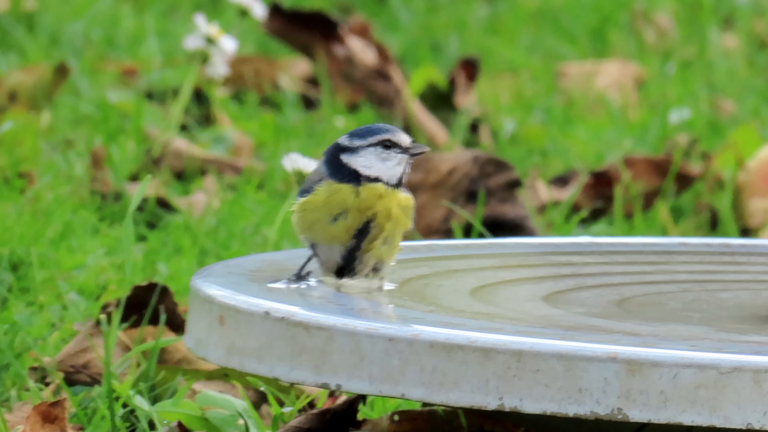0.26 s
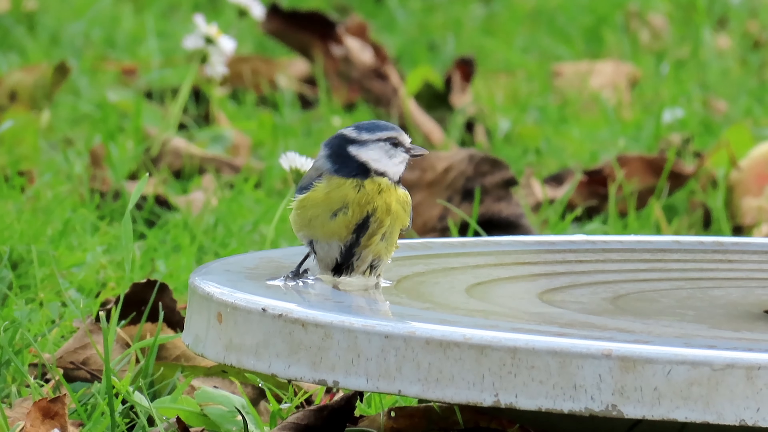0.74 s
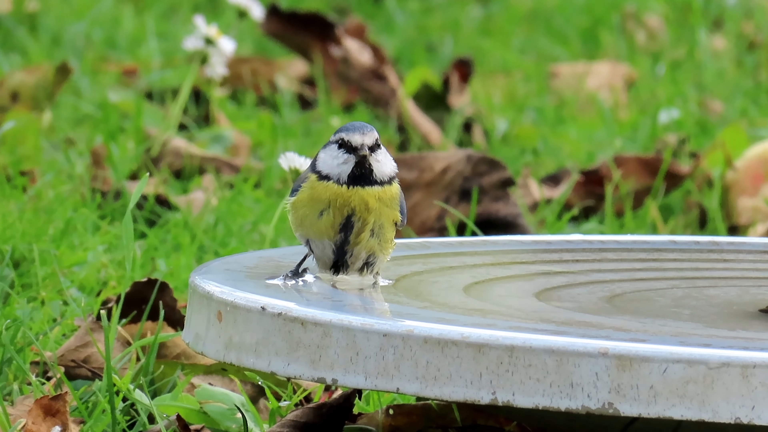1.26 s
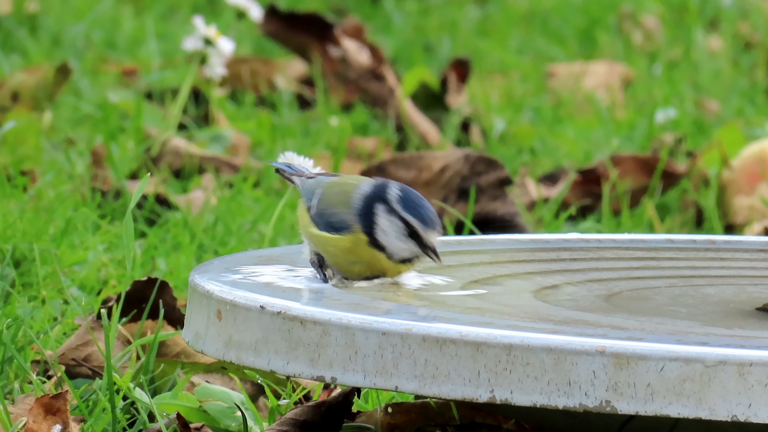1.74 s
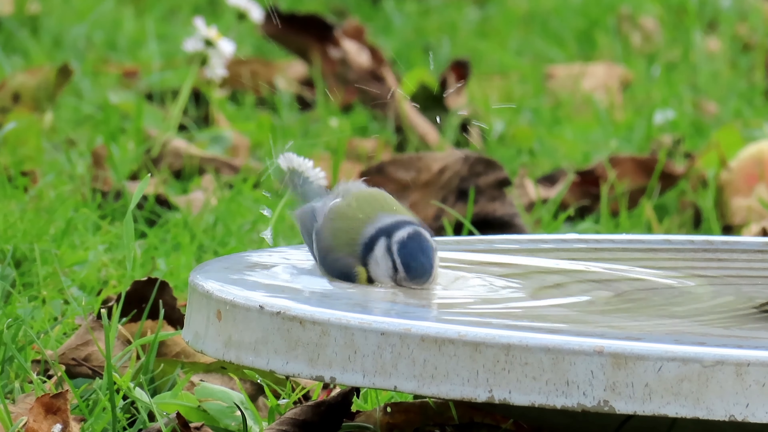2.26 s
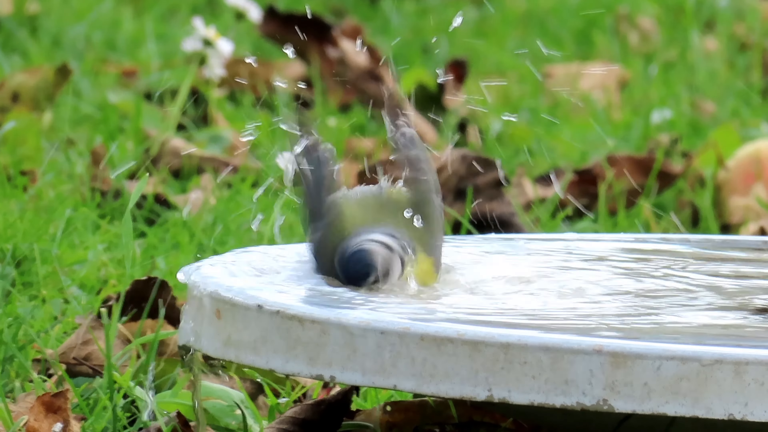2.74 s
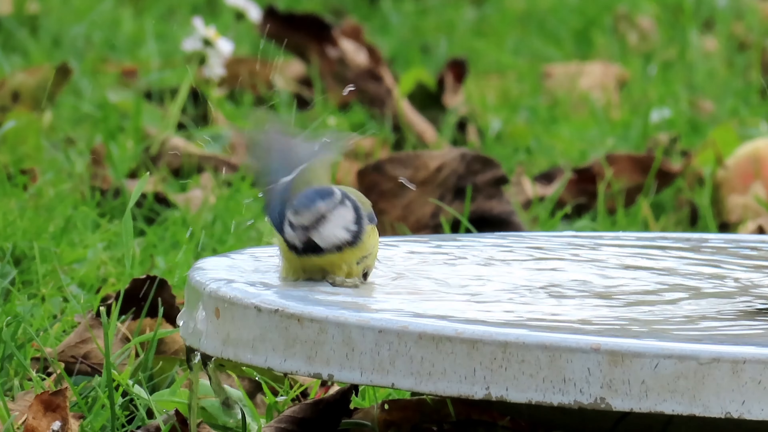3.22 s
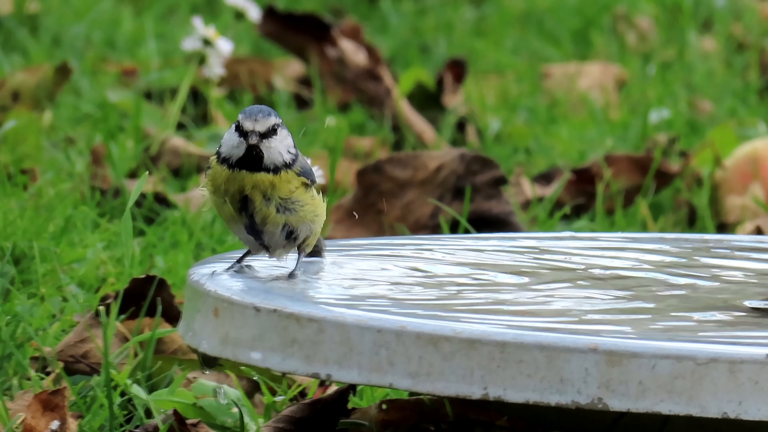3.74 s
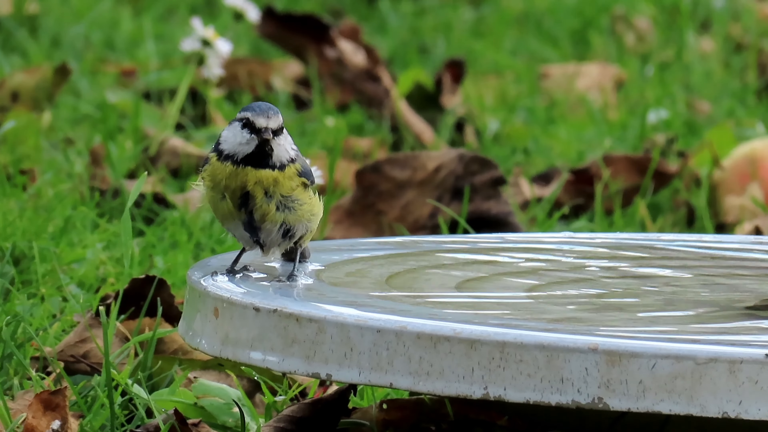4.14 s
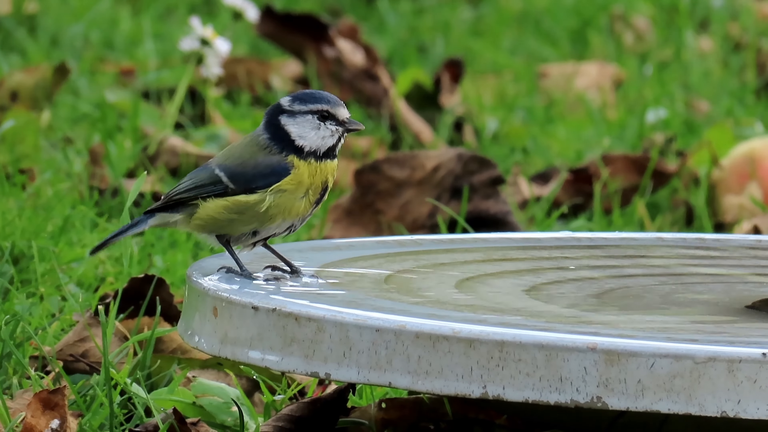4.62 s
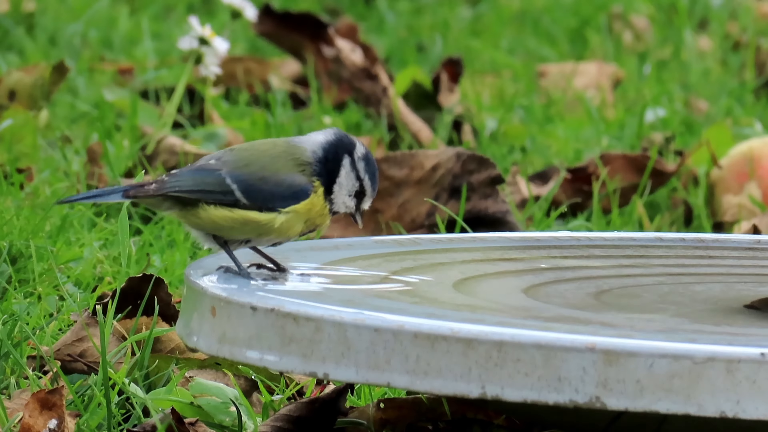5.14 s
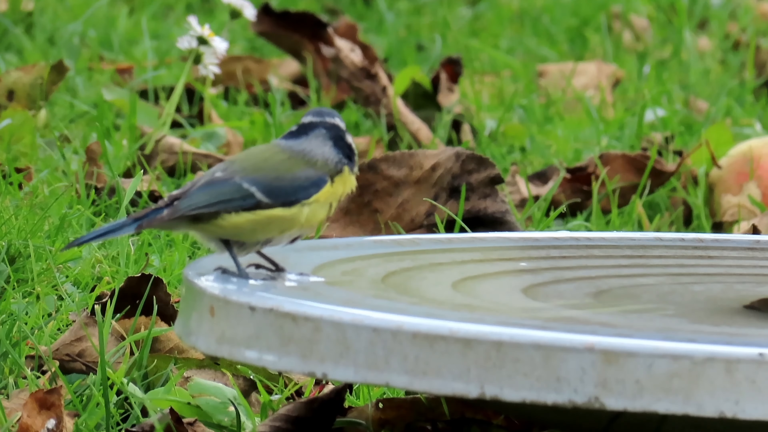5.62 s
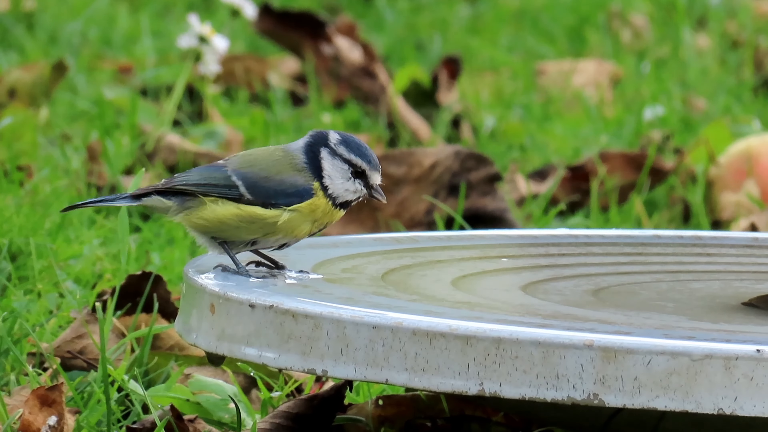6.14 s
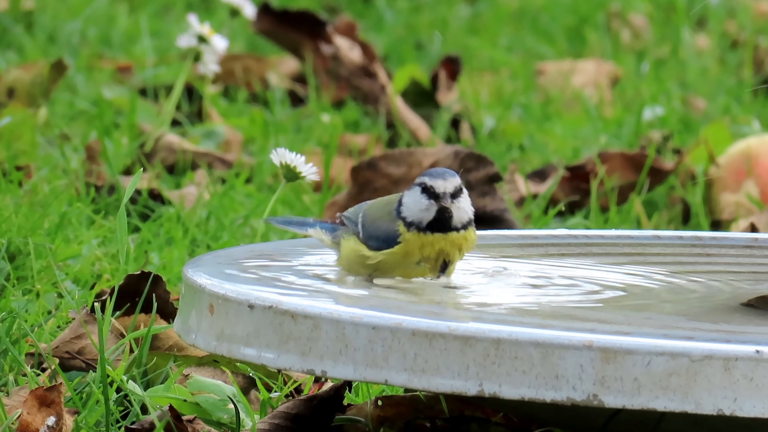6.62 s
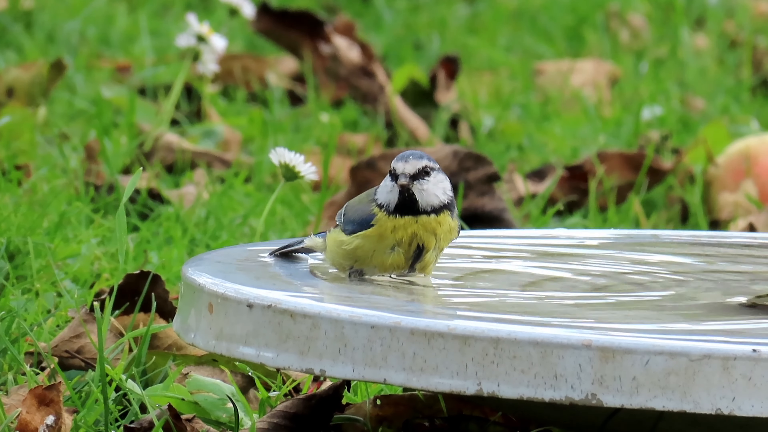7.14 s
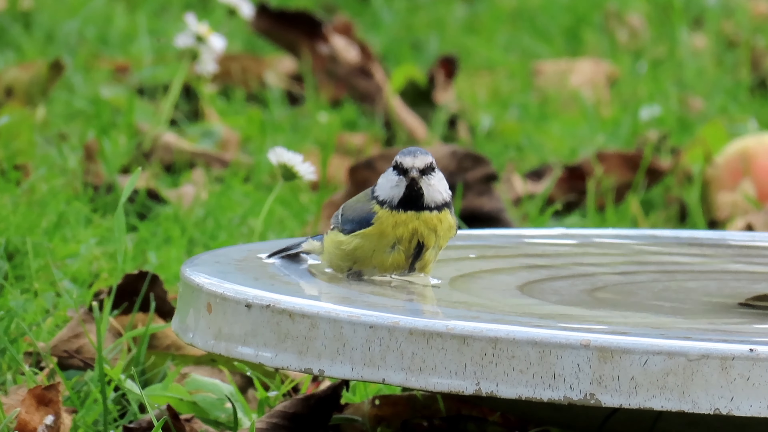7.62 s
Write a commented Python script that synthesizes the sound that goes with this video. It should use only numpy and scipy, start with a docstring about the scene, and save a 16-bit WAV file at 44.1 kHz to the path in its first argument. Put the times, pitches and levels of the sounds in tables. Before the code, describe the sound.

Outdoor stereo bird song with a hot, slightly overdriven microphone. Five loud downward whistles open; the middle phrase is quiet, as if turned down; the last is strong, two rapid fluttering trills leading to repeated falling notes. Thin high calls from neighbouring birds sit to the left, over a constant low road roar and wavering drone. No water splashing is heard.

```python
"""A tit sings in a garden: two high warbled notes, then a run of falling slurs; loud, faint, and loud again.
Its notes are gliding sines; the slurs overdrive their microphone channel, the warbles are limited.
Other small birds call from the left as gliding sines, with echoes; soft ticks are puffs of band noise.
Distant traffic rumbles steadily beneath: coloured noise and a wavering low drone."""
import sys
import numpy as np
from scipy import signal
from scipy.fft import rfft, irfft, next_fast_len
from scipy.io import wavfile
from scipy.ndimage import uniform_filter1d, map_coordinates

SR = 44100
rng = np.random.default_rng(int(sys.argv[2]) if len(sys.argv) > 2 else 0)


def generate_wav(signal):
    """Clip the signal to [-1, 1] and save it as 16-bit WAV at the path in sys.argv[1]."""
    frames = np.transpose(np.atleast_2d(signal))
    scaled = np.clip(frames, -1, 1) * 32767
    pcm = np.round(scaled).astype(np.int16)
    wavfile.write(sys.argv[1], SR, pcm)


N = 347067
T = np.arange(N) / SR


def amp(db):
    """Decibel law: the amplitude gain of a level in dB."""
    return 10 ** (np.asarray(db) / 20)


def unit(x):
    """Normalisation: x scaled to rms 1."""
    return x / np.sqrt(np.mean(x ** 2) + 1e-20)


def along(points, hz):
    """Logarithmic frequency scale: (Hz, value) points interpolated on a log axis."""
    f, v = np.transpose(points)
    return np.interp(np.log(hz + 1), np.log(f + 1), v)


def wobble(rate):
    """Band-limited randomness: a smooth curve through random knots, rate of them a second."""
    return map_coordinates(rng.standard_normal(int(N * rate / SR) + 4), [T * rate])


def filtered(x, response):
    """Linear filtering: the spectrum of x times a response of frequency."""
    m = next_fast_len(N + 8192)
    return irfft(rfft(x, m) * response(np.fft.rfftfreq(m, 1 / SR)), m)[..., :N]


def span(start, length):
    """Sampling: the sample times of a note, in seconds."""
    return (round(start * SR) + np.arange(round(length * SR))) / SR


def add(out, t, hz, db, second_db=-120, third_db=-120, waver=0.036):
    """Frequency modulation: adds a sine with weak overtones, its phase the integral of its pitch."""
    hz, db = uniform_filter1d([hz, db], size=89, mode="nearest")  # rounds the corners
    # the voice is never quite steady
    hz = hz * (1 + waver * uniform_filter1d(rng.standard_normal(len(t)), size=131))
    phase = 2 * np.pi * (np.cumsum(hz) / SR + rng.random())
    tone = np.sin(phase) + amp(second_db) * np.sin(2 * phase) + amp(third_db) * np.sin(3 * phase)
    edge = np.clip(np.minimum(t - t[0], t[-1] - t) / 0.0011, 0, 1)
    note = np.sqrt(2) * amp(db) * edge * tone  # db is the rms level of the fundamental
    inside = (t >= 0) & (t < T[-1])
    out[np.round(t[inside] * SR).astype(int)] += note[inside]


def echoes(x, delay, t60, channels):
    """Diffuse scattering: hedges and walls answer in decaying lumps; moving leaves keep changing them."""
    t = np.arange(SR // 2) / SR
    lumps = amp(0.85 * wobble(270)[:len(t)])
    decay = amp(-60 * t / t60) * (t > delay)
    tail = rng.standard_normal((channels, len(t))) * lumps * decay
    tail = tail / np.linalg.norm(tail[0])  # energy 1
    stirred = x * np.cos(2.45 * wobble(90))
    return signal.fftconvolve(stirred[None], tail, axes=1)[:, :N]


def patchy(pair, depth_db):
    """Time-varying spectrum: passing vehicles swell here and there in pitch and time."""
    z = signal.stft(pair, nperseg=1024)[2]
    field = uniform_filter1d(rng.standard_normal(z.shape[1:]), size=5, axis=0)
    field = uniform_filter1d(field, size=14, axis=1)
    return signal.istft(z * amp(depth_db * unit(field)), nperseg=1024)[1][:, :N]


# Spectrum of the roar. Each row: frequency in Hz, relative noise density in dB per Hz.
ROAR_SPECTRUM = [(12, -39), (20, -6.5), (66, -5.5), (140, -6), (183, -9.5), (242, -9.5), (272, -7),
                 (310, -13), (477, -12), (517, -12), (561, -14.5), (630, -18), (690, -12.5), (830, -10.5),
                 (915, -16), (1020, -17.5), (1100, -15), (1220, -20), (1680, -21.5), (1810, -23.5),
                 (3800, -29.5), (6720, -36), (13000, -48), (15000, -49.5)]
# Stereo likeness of the roar. Each row: frequency in Hz, left-right correlation (1 is mono).
ROAR_LIKENESS = [(25, 0.97), (60, 1), (99, 0.86), (160, 0.77), (270, 0.15), (450, -0.15), (740, 0.87),
                 (1220, 0.57), (2010, 0.33), (3330, 0.29), (5500, 0.53), (9080, 0.57), (15000, 0.34)]


def traffic_roar():
    """Partial coherence: mid and side noise, shared out by frequency, make a roar near mono in the bass."""
    def mid_side_response(hz):
        angle = np.arccos(np.clip(along(ROAR_LIKENESS, hz), -1, 1)) / 2
        return amp(along(ROAR_SPECTRUM, hz)) * [np.cos(angle), np.sin(angle)]

    noise = patchy(rng.standard_normal((2, N)), depth_db=1.5)
    mid, side = filtered(noise, mid_side_response)
    return unit(np.array([mid + side, mid - side])) * amp(-36 + 0.1 * wobble(3.5))


# Course of the drone. Each row: time in seconds, mean pitch in Hz, level in dB before trim and waver.
DRONE_COURSE = [(0.0, 69, -39.5), (1.58, 69.2, -43.5), (1.78, 74, -52), (1.9, 70, -39.5), (2.19, 71.2, -44),
                (2.28, 75.5, -44), (2.5, 70.16, -42), (6.16, 72, -44), (6.55, 69, -52), (6.68, 63, -55),
                (6.79, 62.5, -46), (6.9, 72.7, -42), (7.15, 74, -54), (7.28, 67.6, -51), (7.43, 74.2, -43),
                (7.87, 74.3, -43)]


def traffic_drone():
    """Slow modulation: one low sine wavers in pitch and level."""
    s, hz, db = np.transpose(DRONE_COURSE)
    pitch_hz = np.interp(T, s, hz) + 0.79 * wobble(3)
    level_db = np.interp(T, s, db) - 0.5 + 1.1 * wobble(8)
    return np.sqrt(2) * np.sin(2 * np.pi * np.cumsum(pitch_hz) / SR) * amp(level_db)


# Soft dull ticks. Each row: start in seconds, centre in Hz, noise level in dB before shaping.
DULL_TICKS = [(.512, 2500, -44), (.566, 2700, -45.5), (.664, 2500, -48), (6.855, 2250, -48),
              (7.127, 2300, -39), (7.468, 2700, -40.5), (7.62, 2500, -46)]


def ticks():
    """Band-limited noise bursts: brief ragged puffs around 2 to 3 kHz that start sharply."""
    rise_s, hold_s, fall_s = .002, 0.0085, .004  # the hold counts from the start of the rise
    out = np.zeros(N)
    for s, centre_hz, db in DULL_TICKS:
        noise = rng.standard_normal(N)
        puff = unit(filtered(noise, lambda hz: np.exp(-((hz - centre_hz) / 650) ** 2)))
        rise = np.clip((T - s) / rise_s, 0, 1)
        fall = np.exp(-np.clip((T - s - hold_s) / fall_s, 0, None))
        out += amp(db) * rise * fall * puff
    return out * amp(1.0 * wobble(300))


# Short peeps. Each row: centre time in seconds, pitch in Hz, peak level in dB before placing.
SHORT_PEEPS = [(1.355, 10200, -56), (1.376, 10250, -60), (1.395, 10300, -55), (1.536, 8400, -59),
               (1.895, 10250, -65), (4.992, 6900, -57), (5.98, 9100, -57)]


def peeps():
    """Gaussian tone bursts: each peep is one steady pitch under a bell-shaped envelope."""
    out = np.zeros(N)
    for s, hz, db in SHORT_PEEPS:
        t = span(s - .008, .016)
        add(out, t, hz + 0 * t, db - 9 * ((t - s) / 0.0078) ** 2)
    return out


# Whistles of far birds. Each row: start in seconds, length in seconds, first, middle and last pitch in Hz,
# first and last level in dB before placing.
FAR_WHISTLES = [(2.765, 0.24, 8420, 7940, 7780, -61, -63), (4.388, .06, 4800, 4850, 4790, -58, -60),
                (5.578, 0.042, 9000, 7500, 6550, -57, -62), (5.63, .024, 6400, 6440, 6480, -55, -56),
                (5.768, .018, 4820, 4960, 5000, -62, -62), (5.789, .036, 5180, 5480, 5550, -52, -58),
                (5.827, .034, 5470, 5380, 5100, -55, -52.5), (5.872, .014, 5050, 4950, 4900, -58, -53),
                (5.892, .012, 5000, 4980, 4950, -62, -62), (5.834, 0.022, 7750, 7550, 7420, -62, -63),
                (6.778, 0.02007, 9000, 8550, 8000, -60, -51)]


def whistles():
    """Parabolic glide: each whistle bends in one smooth arc through its three pitches."""
    out = np.zeros(N)
    for s, length, first_hz, middle_hz, last_hz, first_db, last_db in FAR_WHISTLES:
        t = span(s, length)
        u = (t - s) / length
        bow_hz = middle_hz - (first_hz + last_hz) / 2
        arc = 1 - (2 * u - 1) ** 2
        hz = first_hz + (last_hz - first_hz) * u + bow_hz * arc
        add(out, t, hz, first_db + (last_db - first_db) * u, waver=0.06)
    return out


# V-shaped contact calls. Each row: start in seconds, fall and rise in seconds, crest, trough and last pitch
# in Hz, how late the rise comes (1 is straight), level in dB before shaping and placing.
CONTACT_CALLS = [(.174, 0.021, 0.04, 9000, 8200, 8950, 1.2, -51),
                 (.75, 0.022, 0.045, 9100, 8100, 9000, 1.6, -51.5),
                 (1.344, 0.021, .045, 9000, 7500, 8300, 0.72, -58),
                 (1.746, 0.025, 0.04, 9400, 7500, 8600, .9, -53),
                 (2.155, 0.024, 0.041, 8760, 7040, 8300, 0.75, -54),
                 (2.394, .016, 0.047, 8500, 6950, 8150, 1.4, -55.5),
                 (3.444, 0.022, 0.05, 8840, 6700, 8150, 0.8, -46),
                 (3.769, 0.022, 0.051, 8740, 6850, 8850, 2, -44),
                 (7.745, 0.028, 0.033, 9240, 7470, 8270, 0.67, -42)]


def contact_calls():
    """Frequency sweep: a call flicks up to its crest, falls to a trough and rises again."""
    hook_share, hook_depth = 0.3, 0.514  # flick up: share of the fall time, share of height before the curve
    fall_curve, edge_db, edge_s = 1.7, 8, 0.0063
    weak_fall_db, fade_db = 0.5, 4  # the falling stroke is fainter than the rise, and the rise fades
    out = np.zeros(N)
    for s, fall, rise, crest_hz, trough_hz, last_hz, lateness, db in CONTACT_CALLS:
        t = span(s, fall + rise)
        high = np.interp(t - s, [0, hook_share * fall, fall], [1 - hook_depth, 1, 0]) ** fall_curve
        late = np.clip((t - s - fall) / rise, 0, 1) ** lateness
        hz = trough_hz + (crest_hz - trough_hz) * high + (last_hz - trough_hz) * late
        edge = np.clip(1 - np.minimum(t - t[0], t[-1] - t) / edge_s, 0, 1)
        falling = np.clip((s + fall - t) / edge_s, 0, 1)
        level_db = db - edge_db * edge - weak_fall_db * falling - fade_db * late ** 2
        add(out, t, hz, level_db, waver=0.254)
    return out


def neighbours():
    """Interaural time and level differences: birds off to the left, half lost in echoes."""
    def arrival(hz):
        return np.exp(1j * np.pi * hz * 3.5e-5 * np.array([[1], [-1]]))  # left hears it 35 microseconds first

    calls = contact_calls() * amp(2.5 * wobble(300))  # leaves in the path make far calls flutter
    clear = whistles() + peeps()  # these come through open air
    direct = filtered(calls + amp(1.5) * clear, arrival) * amp([[2.2], [.7]])
    near = amp(-.5) * echoes(calls, .001, t60=.11, channels=2)  # twigs close to the birds smear each call
    far = amp(-5) * echoes(calls + clear, 0.0073, t60=0.25, channels=2)
    return direct + near + far


# Warbled notes. Each row: start and end in seconds, first and crest pitch in Hz, settling and swell in
# seconds, level in dB before shaping and the channel, first and last dip in seconds, number of dips,
# share by which dips come faster at both ends.
WARBLED_NOTES = [(2.883, 3.057, 6900, 7600, 0.039, 0.046, -30.5, 2.929, 3.0496, 8, 0.064),
                 (3.157, 3.3415, 6900, 7500, 0.048, 0.036, -23.5, 3.198, 3.3355, 9, .03),
                 (6.678, 6.8534, 6690, 7495, 0.038, 0.052, -28, 6.7329, 6.8549, 8, 0.062),
                 (6.935, 7.123, 6880, 7384, 0.03, 0.038, -21.5, 6.9762, 7.116, 9, 0.098)]


def warbles():
    """Joint frequency and amplitude modulation: the pitch dips again and again, and the level with it."""
    dip_hz, dip_grows_s = 1040, 0.047  # the depth that the growing dips approach, and how soon
    dip_in_s, dip_out_s, dip_pointed = 0.0035, .0028, 1.6  # slides in, snaps back; lower is more pointed
    choke_db, choke_lag_s, choke_s, choke_scatter = 5, 0.00086, 0.0013, .25  # air thins just after each dip
    sag_hz, sag_s = 242, 0.018  # the crest sags as the note runs out
    out = np.zeros(N)
    for s, end, first_hz, crest_hz, settling, swell, db, first, last, count, hurry in WARBLED_NOTES:
        t = span(s, end - s)
        rising = np.clip(1 - (t - s) / swell, 0, 1)
        even = np.linspace(0, 1, round(count))
        dips = first + (last - first) * (even - hurry * np.sin(2 * np.pi * even) / (2 * np.pi))
        lag = t[:, None] - dips
        width = np.where(lag < 0, dip_in_s, dip_out_s)
        depth = 1 - np.exp(-(dips - first + 0.015) / dip_grows_s)
        depth = depth * (1 - 0.16 * even ** 6)  # holds back the last dip
        dip = (depth * np.exp(-np.abs(lag / width) ** dip_pointed)).sum(1)
        # no two dips thin the air alike
        thinning = np.sqrt(depth) * np.exp(choke_scatter * rng.standard_normal(len(dips)))
        choke = (thinning * np.exp(-((lag - choke_lag_s) / choke_s) ** 2)).sum(1)
        settle = (crest_hz - first_hz) * np.exp(-(t - s) / settling)
        sag = sag_hz * np.exp((t - end) / sag_s)
        hz = crest_hz - settle - sag - dip_hz * dip
        add(out, t, hz, db - 24 * rising ** 1.5 - choke_db * choke)
    return out


# Falling slurs. Each row: start and end in seconds, drop-in from above in Hz, shoulder and last pitch in Hz,
# how much the slide slows down (0 is straight), final droop in Hz, level in dB before shaping and the channel.
FALLING_SLURS = [(-.052, 0.0464, 250, 5900, 5100, 1.7, 21, -21),
                 (0.1, 0.197, 180, 5880, 5086, 2.1, 18, -20.5),
                 (0.248, 0.348, 199, 5930, 5010, 1.75, 37, -21),
                 (0.405, 0.5035, 200, 5870, 5054, 1.9, 16, -21),
                 (0.568, 0.664, 170, 5950, 5116, 3.2, 8.1, -20),
                 (3.423, 3.528, 200, 6060, 5110, 2.1, 28, -24.5),
                 (3.581, 3.6817, 120.4, 5920, 5100, 2.7, 20, -20),
                 (3.736, 3.8258, 100, 5910, 5080, 2.1, 30, -17),
                 (3.883, 3.984, 120.4, 5900, 5040, 1.9, 50, -18),
                 (4.048, 4.145, 40.1, 5880, 5110, 2.7, 106, -18),
                 (4.206, 4.301, 60.2, 5900, 5120, 2.2, 87, -19.5),
                 (4.373, 4.463, 100, 5820, 5150, 1.9, 148, -19.5),
                 (7.199, 7.306, 121, 6160, 5170, 2.3, 110, -26),
                 (7.361, 7.4616, 178.7, 5940, 5035, 2, 10.5, -22),
                 (7.514, 7.619, 301, 5890, 5070, 2.34, 16, -21),
                 (7.674, 7.7723, 250, 5790, 5014, 1.5, 16, -22),
                 (7.833, 7.93, 250, 5850, 5130, 2.2, 20, -21)]


def slurs():
    """Exponential glide: each slur swells while its pitch slides down, and stops short."""
    swell_db, swell_s, stop_db, stop_s = 28, 0.018, 5, 0.0039
    # drops in from above, rests on its shoulder, droops at the end
    lead_s, shoulder_s, droop_s = .0105, .0245, 0.0132
    pip_lag_s, pip_s, pip_db = .018, .005, -29  # a faint pip follows each stop; mean lag and mean level
    out = np.zeros(N)
    for s, end, lead_hz, shoulder_hz, last_hz, slows, droop_hz, db in FALLING_SLURS:
        length = end - s
        t = span(s, length + stop_s)
        age = t - s
        slid = np.clip((age - shoulder_s) / (length - shoulder_s), 0, 1)
        height = (np.exp(-slows * slid) - np.exp(-slows)) / (1 - np.exp(-slows))
        hz = last_hz + (shoulder_hz - last_hz) * height + lead_hz * np.exp(-age / lead_s)
        hz = hz - droop_hz * np.exp((age - length) / droop_s)
        swelling_db = -swell_db * np.exp(-age / swell_s)
        stopping_db = -stop_db * np.clip(1 - (length - age) / stop_s, 0, 2) ** 2
        octave_db = -35 - 1.4 * (db + 27)  # softer notes are less pure
        add(out, t, hz, db + swelling_db + stopping_db, octave_db, third_db=-39)
        t = span(end + pip_lag_s * (1 + .15 * rng.normal()) - 2 * pip_s, 4 * pip_s)
        bell_db = -9 * ((t - t.mean()) / pip_s) ** 2
        add(out, t, last_hz + 0 * t, db + pip_db + 3.2 * rng.normal() + bell_db)
    return out


def overdriven(x, top, hardness):
    """Saturation and aliasing: peaks flatten; high odd overtones fold back as faint rising lines."""
    return x / (1 + np.abs(x / top) ** hardness) ** (1 / hardness)


def held_down(x, top, hardness):
    """Envelope limiting: the loudness is held under a ceiling, adding almost no overtones."""
    size = np.abs(signal.hilbert(x, next_fast_len(N)))[:N] + 1e-9
    held_size = size / (1 + (size / top) ** hardness) ** (1 / hardness)
    return x * held_size / size


# Fader of the song's channel. Each row: time in seconds, gain in dB.
SONG_FADER = [(0, 0), (1.5, -3), (2, -21.5), (5, -19), (5.5, -4), (8, -.1)]


def tit():
    """Saturation before gain: slurs overdrive, warbles are limited, then the middle phrase is turned down."""
    near = 0
    # each kind of note has a ceiling of its own
    for notes, ceiling, top in ((slurs(), overdriven, 0.077), (warbles(), held_down, .1)):
        song = notes * amp(1.1 * wobble(150))
        song = song + amp(-22.0) * echoes(song, 0.0087, t60=0.21, channels=1)[0]
        near = near + ceiling(song, top, hardness=17.0)
    near = near * amp(np.interp(T, *np.transpose(SONG_FADER)))
    return near + amp(-46) * echoes(near, 0.011, t60=0.33, channels=2)


def scene():
    """Superposition: traffic, ticks, neighbours and song add up."""
    return traffic_roar() + traffic_drone() + ticks() + neighbours() + tit()


def record(dry):
    """Band limiting: the highest treble is softened, then cut off; a small constant offset is added."""
    top_hz, edge_hz = 15830, 240

    def response(hz):
        softening = amp(-4.5 * np.clip((hz - 14600) / 1200, 0, 1))
        return softening * np.clip((top_hz - hz) / edge_hz + .5, 0, 1)

    return filtered(dry, response) + 0.0018


dry = scene()
out = record(dry)
generate_wav(out)
```